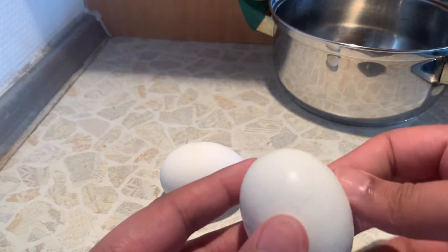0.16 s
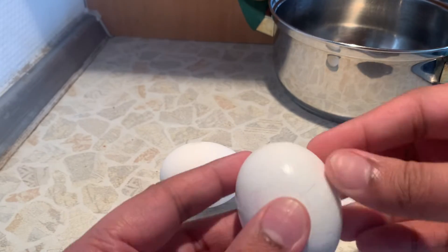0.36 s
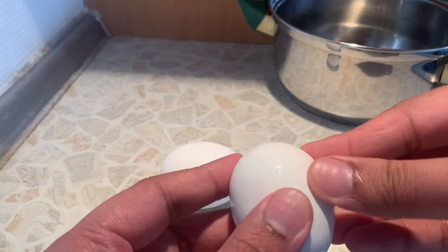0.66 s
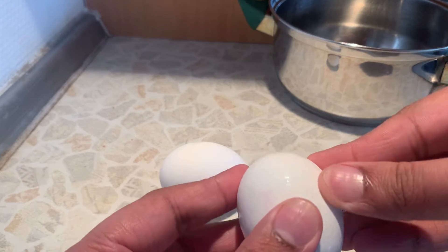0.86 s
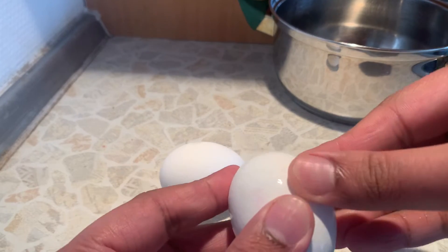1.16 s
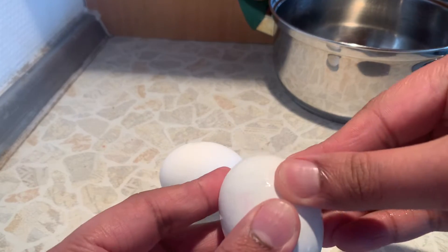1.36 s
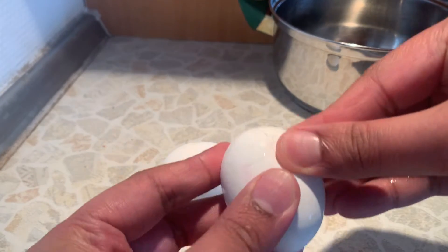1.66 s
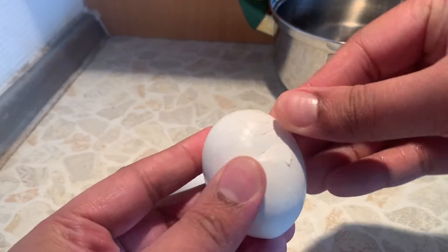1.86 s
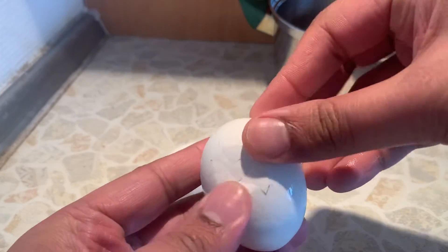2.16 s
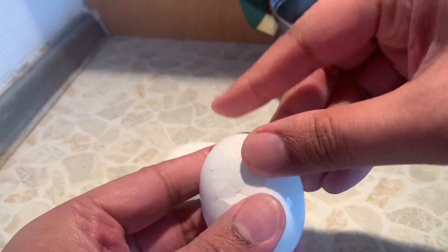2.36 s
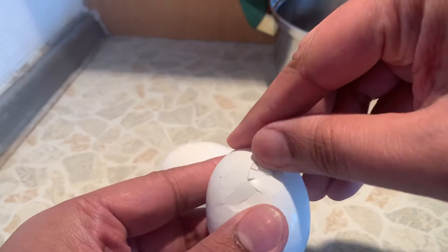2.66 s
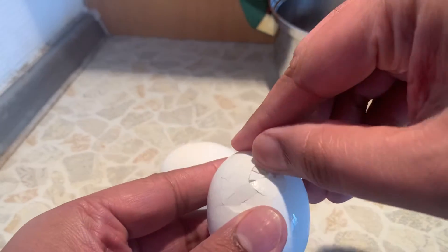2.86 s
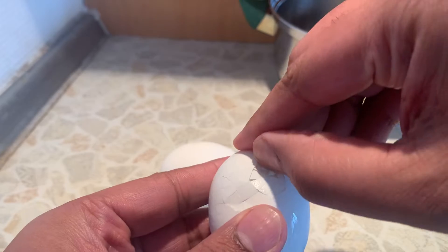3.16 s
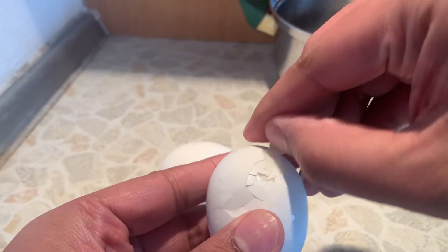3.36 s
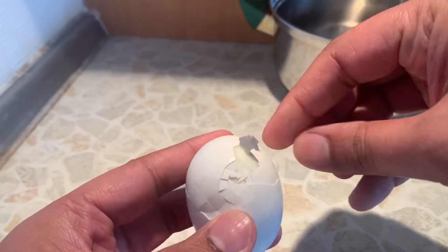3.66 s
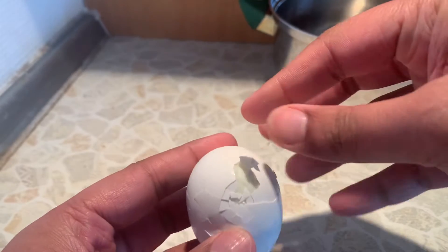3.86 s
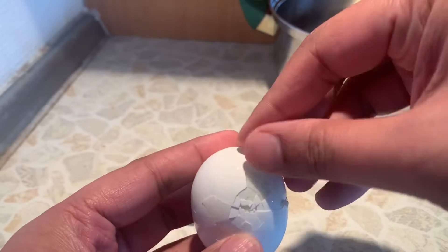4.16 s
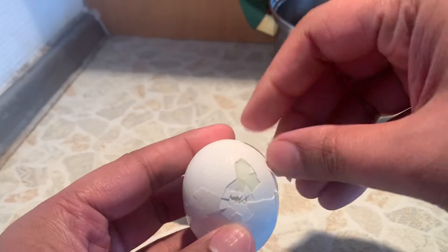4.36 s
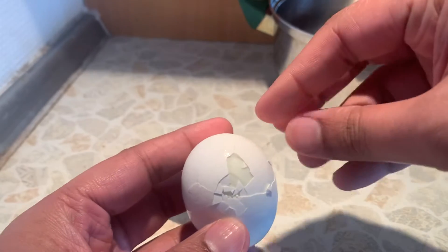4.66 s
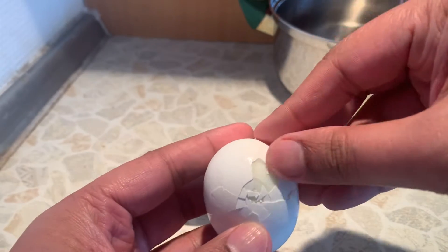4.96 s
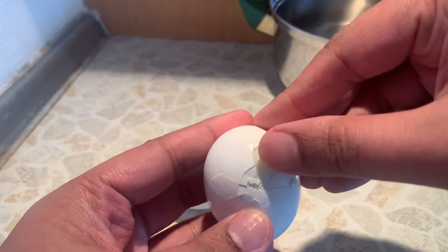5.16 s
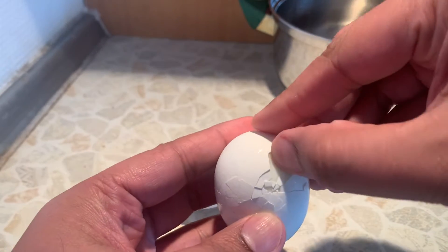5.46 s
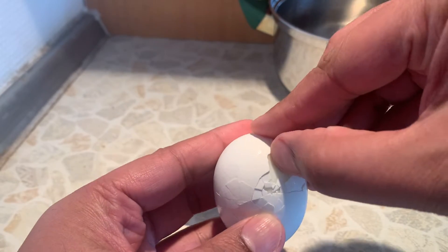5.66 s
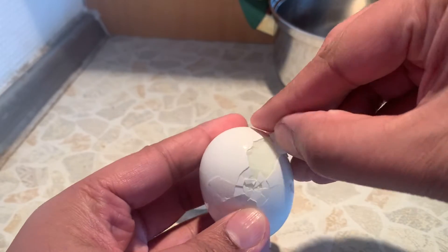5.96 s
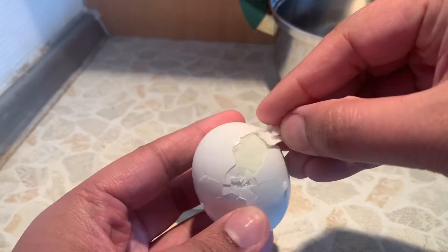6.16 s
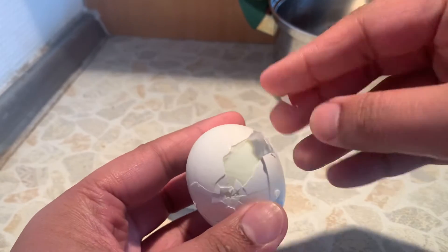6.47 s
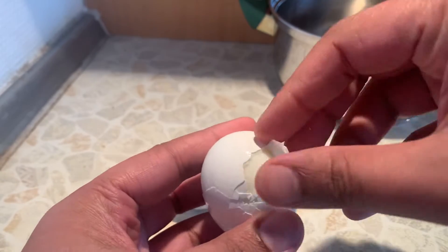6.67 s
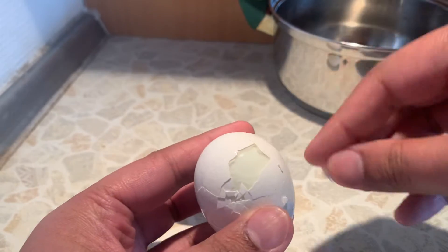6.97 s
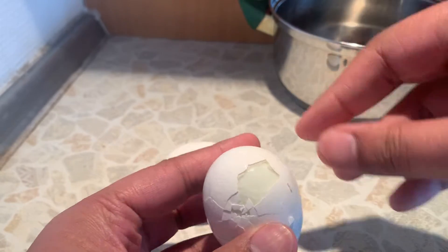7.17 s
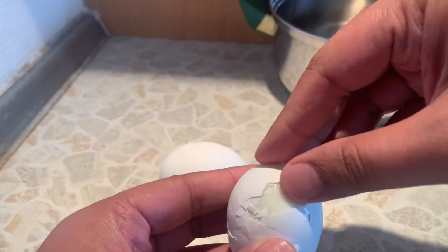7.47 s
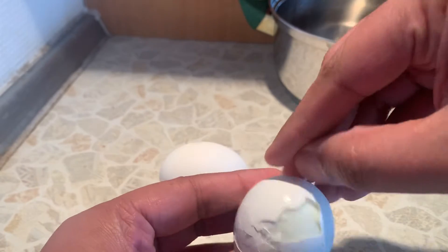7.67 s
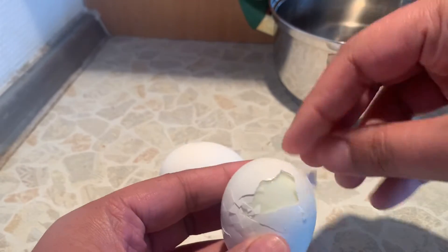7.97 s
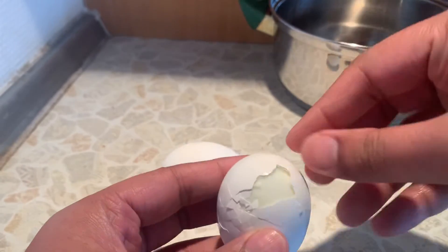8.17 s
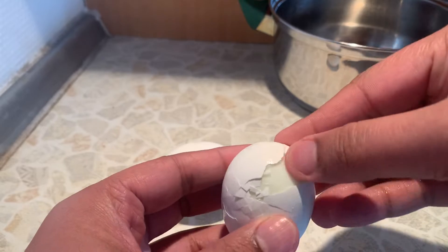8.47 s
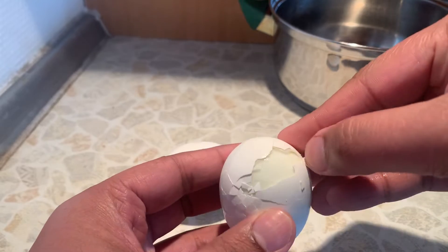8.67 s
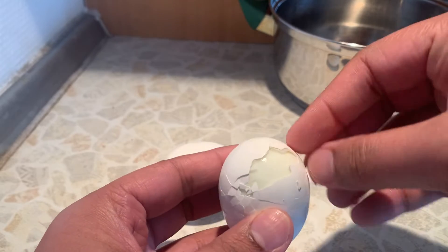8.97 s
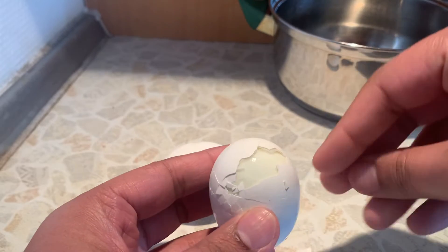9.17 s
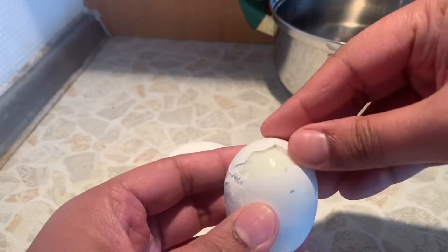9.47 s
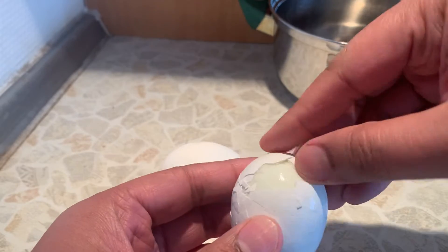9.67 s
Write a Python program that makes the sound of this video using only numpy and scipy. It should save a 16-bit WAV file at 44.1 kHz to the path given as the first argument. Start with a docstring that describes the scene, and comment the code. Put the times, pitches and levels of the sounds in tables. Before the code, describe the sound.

Close stereo pickup of a boiled egg being peeled by hand in a quiet kitchen, about ten seconds. Faint hiss and low hand rumble continue throughout. From 0 to 0.4 fingertips rub the smooth shell with barely audible squeaks; tiny ticks follow. At 1.4-1.7 the shell gives way in a dense, brittle crunch. Another crackling cluster comes at 2.35-2.6, then short cracks near 3.0, 3.3, 3.65 and 3.8. Sparse ticks and a thin bright crack at 4.6 lead to a soft rumble around 5. At 5.8-5.95 tearing builds to the loudest, very bright snap. Smaller crackles follow at 6.05-6.8 and 7.2-7.4. A strong, hollower snap lands at 7.69, with a dull thump. After quiet handling and low bumps, hollow ringing snaps cluster around 8.65, then lighter cracks at 9.15-9.75. Short, soft room reflections.

```python
"""A hard-boiled egg is cracked and peeled by hand, close up in a quiet kitchen.
Coloured noise makes the low rumble of the hands, the faint hiss, the first rubs and the dull thumps.
Then lifted shell snaps, and shell on the egg cracks with a small thud: short forces ring a piece of shell.
Around the breaks, clumps of tiny fractures crumble the shell and tear it off its skin.
Filtered, decaying noise lets the room answer the sounds of the egg all along."""
import sys
import numpy as np
from scipy import signal
from scipy.fft import rfft, irfft, next_fast_len
from scipy.io import wavfile
from scipy.ndimage import uniform_filter1d

SR = 44100
rng = np.random.default_rng(int(sys.argv[2]) if len(sys.argv) > 2 else 0)


def unload_wav(signal):
    """Save mono or channel-first audio to the path in sys.argv[1] as 16-bit WAV at rate SR, clipped to [-1, 1]."""
    wavfile.write(
        sys.argv[1],
        SR,
        np.round(np.clip(np.atleast_2d(signal).T, -1, 1) * 32767).astype(np.int16),
    )


N = 432621
EDGE_HZ = 16100  # upper limit of the sound

# registers of the shell, in order egg body, loose hollow shell, small plates, breaking edge: low_hz, high_hz
REGISTERS = [(350, 1300), (1300, 3400), (3400, 8000), (8000, 16500)]
# broad colour of breaking shell: frequency_hz, relative_level_db
SHELL_COLOUR = [(300, -12.5), (400, -10), (490, -1.5), (680, -4.5), (850, -18), (1100, -6.5), (1300, -10.5),
                (1600, -4), (2100, -1), (2500, -4), (3000, -7), (4200, -0.5), (5400, -1), (6700, 1),
                (8000, -2), (10300, 4.5), (11800, 3), (13200, 4.5), (15500, -1)]
# overtones of a curved piece of shell: multiple of its pitch, gain_db
PIECE_MODES = [(1, 7.5), (2.05, 0.5), (3.15, 1), (3.951, -0.5), (4.7, 4.5)]
# snaps of shell lifted clear of the egg: time_s, strength_db, depth_db, pitch_hz of the piece
SNAPS = [(0.732, -71.5, -1, 2310), (0.76, -73, 8, 2260), (1.037, -64.5, -7.5, 2530), (1.267, -89, 16, 2270),
         (1.392, -59.5, -16, 12160), (1.3987, -54.5, -17, 8050), (1.416, -56, -20, 12500),
         (1.429, -48.5, -15, 13760), (2.3416, -56, -18, 8600), (2.3982, -55, -21, 4380),
         (2.422, -47, -14, 6200), (2.429, -55, -9, 2690), (2.436, -58, -4, 4350), (2.468, -54, -16, 12000),
         (2.491, -54, -12, 6800), (2.4945, -52, -16, 11300), (2.501, -52.5, -11, 9000),
         (2.511, -44.5, -17, 11900), (2.5197, -45.5, -8, 10800), (2.7753, -72, -8, 4260),
         (2.8241, -77, -0.5, 5300), (2.849, -65, -19, 5250), (2.944, -55.5, -15.5, 8600),
         (3.036, -61, -31, 14000), (3.111, -70, -20, 11100), (3.119, -68.5, -18.5, 4620),
         (3.445, -63, -15, 13600), (3.4906, -56, -17, 4230), (3.78, -43, -22.5, 12140),
         (3.852, -54, -33.5, 14460), (3.86, -53, -41, 11800), (4.1086, -49, -20.5, 6700),
         (4.1168, -51, -17.5, 4360), (4.128, -57.5, -18.5, 6540), (4.568, -52.5, -19.5, 9600),
         (4.7595, -44, -20.5, 15300), (4.91, -63.5, -13, 11100), (4.953, -54.5, -18, 16100),
         (5.0931, -75.5, 0, 6240), (5.505, -66.5, -5.5, 1860), (5.5468, -68.5, -4, 3340),
         (5.572, -69, -11, 10800), (5.6876, -50.5, -28, 10700), (5.7918, -60, -26, 4850),
         (5.8483, -38, -32, 9700), (5.857, -45, -22, 8860), (5.881, -34.5, -22, 7000),
         (5.8837, -51.5, -1.5, 2150), (5.862, -40, -17, 10600), (5.8753, -45, -22, 4900),
         (5.8888, -37, -20, 6500), (5.897, -42.5, -23, 10300), (5.9069, -29.5, -29.5, 9900),
         (5.921, -28, -25.5, 9900), (5.926, -15.5, -33, 10400), (5.9274, -34.5, -10.5, 2190),
         (5.9275, -24, -22, 6300), (6.0372, -61, -36, 9900), (6.0572, -47, -24, 8430),
         (6.06, -41, -28, 9500), (6.1015, -57.5, -30, 10250), (6.117, -52, -11, 6300),
         (6.1897, -64, -10, 10360), (6.23, -64, -14.5, 10000), (6.2413, -56.5, -9, 2100),
         (6.25, -58.5, -9, 6150), (6.268, -63, -8, 10470), (6.525, -66.5, -7, 3490),
         (6.6001, -44.5, -33.5, 11500), (6.6217, -47.5, -44, 8850), (6.739, -46.5, -25.5, 10700),
         (6.749, -41, -18, 7530), (6.7595, -38, -18.5, 11460), (6.91, -51, -22, 8270),
         (6.9157, -48.5, -55.5, 13760), (6.9737, -65, -26.5, 9080), (7.089, -76, -17, 10000),
         (7.5755, -52, -48, 9860), (7.629, -45, -24, 11400), (7.6849, -22.5, -17.5, 10900),
         (7.687, -20.5, -13.5, 11500), (7.6877, -33.5, 9, 2000), (7.6923, -32.5, -3, 1900),
         (7.694, -36, -5, 3400), (7.713, -47, -11, 3450), (7.735, -56, 2, 3600), (7.751, -47.5, -13, 10500),
         (7.8002, -49.5, -15.5, 15100), (8.432, -92, 28.5, 1436), (8.466, -65.5, 17, 2024),
         (8.466, -63.5, 9.5, 2900), (8.492, -73.5, 7, 2820), (8.557, -72, 17, 2020),
         (8.5946, -56.5, -11, 2030), (8.606, -57, -15, 7000), (8.626, -32.5, -6.5, 3035),
         (8.647, -38, -9.5, 3150), (8.661, -49.5, 5.5, 3090), (8.672, -46.5, 3.5, 3070),
         (8.6745, -54.5, 7.5, 2130), (8.691, -37.5, -14, 2930), (8.776, -86, 28.5, 2160),
         (9.2147, -60.5, -18.5, 8600), (9.6682, -42.5, -7, 3920), (9.694, -54, -5, 10000),
         (9.744, -41, -4, 8000)]
# cracks of shell that still lies on the egg: time_s, strength_db, depth_db, pitch_hz of the piece
CRACKS = [(1.4517, -36.5, -8, 7200), (1.5026, -34, -9.5, 2670), (1.517, -29, -10, 2650),
          (1.5294, -41.5, -9.5, 3850), (1.5426, -52.5, -14, 4860), (1.563, -29.5, -8.5, 2705),
          (1.565, -28.5, -10.5, 7870), (1.568, -34.5, -6, 7850), (1.5583, -46, -8, 11100),
          (1.5767, -46, -16.5, 7300), (1.678, -64, -8, 9000), (1.6915, -54.5, -21, 11150),
          (1.7, -63.5, 3, 4580), (2.3631, -57.5, -1.5, 10480), (2.3709, -42.5, -10.5, 2590),
          (2.5445, -39.5, -9, 10770), (2.5874, -51.5, -6.5, 3390), (2.598, -64.5, -1.5, 11100),
          (2.9625, -49, -6.5, 7600), (3.0012, -57, -24, 7000), (3.007, -49, -26, 14050),
          (3.2592, -48, -0.5, 4250), (3.2625, -36, -16.5, 6660), (3.2646, -32, -19, 6900),
          (3.645, -33.5, -19, 12060), (3.8225, -54.5, -18, 10100), (4.606, -38.5, -21, 14940),
          (4.6066, -30, -20, 15140), (4.705, -42, -18.5, 15700), (5.4082, -57.5, -4.5, 4700),
          (5.928, -26, -18, 10400), (6.7785, -45, -7, 7610), (7.1708, -32.5, -12, 11300),
          (7.2748, -44.5, -10.5, 8370), (7.322, -55, -12, 8450), (7.4087, -43, -4.5, 4140),
          (7.4273, -44.5, -12, 8760), (8.0953, -41, -12, 8470), (9.152, -36, -15, 7740)]


def amp(db):
    """Decibels to gain."""
    return 10 ** (np.asarray(db) / 20)


def evened(x):
    """Scales to an rms of one."""
    return x / np.sqrt(np.mean(x ** 2) + 1e-20)


def read(points, hz):
    """Reads a table on a log-frequency axis."""
    table_hz, value = np.transpose(points)
    return np.interp(np.log(hz + 1), np.log(table_hz + 1), value)


def add(mix, s, sound):
    """Adds a stereo sound at time s."""
    part = mix[:, max(0, round(s * SR)):][:, :sound.shape[1]]
    part += sound[:, :part.shape[1]]


def causal(points, size=2048):
    """Minimum-phase ring: the given spectrum, with its energy as early as a causal sound allows."""
    log_gain = np.log(amp(read(points, abs(np.fft.fftfreq(size, 1 / SR)))))
    return np.fft.ifft(np.exp(np.conj(signal.hilbert(log_gain)))).real[:size // 2]


SHELL_RING = causal(SHELL_COLOUR)
REGISTER_FILTERS = [signal.butter(order, band, "bandpass", fs=SR, output="sos")
                    for order, band in zip((2, 4, 4, 5), REGISTERS)]


def pair(length, alike):
    """White noise at two microphones, partly shared."""
    first, other = rng.standard_normal((2, length))
    alike = np.clip(alike, 0, 1)
    return np.array([first, alike * first + np.sqrt(1 - alike ** 2) * other])


def drone(spectrum, alike, size=2 ** 19):
    """Steady noise of a given colour with an rms of one."""
    hz = np.fft.rfftfreq(size, 1 / SR)
    inside = (hz > spectrum[0][0]) & (hz < spectrum[-1][0])
    coloured = rfft(pair(size, alike)) * amp(read(spectrum, hz)) * inside
    return evened(irfft(coloured)[:, :N])


def resonate(x, hz, q):
    """A resonance of gain one at hz."""
    return signal.lfilter(*signal.iirpeak(np.clip(hz, 100, SR / 2.2), max(q, 1), fs=SR), x)


def glide(x, hz, q):
    """A resonance of gain one follows the curve hz: shift down to zero, smooth, shift back up."""
    turn = np.exp(2j * np.pi * np.cumsum(hz) / SR)
    decay = np.exp(-np.pi * hz.mean() / max(q, 1) / SR)
    return 2 * (turn * signal.lfilter([1 - decay], [1, -decay], x / turn)).real


def jolts(times, levels_db, fall_s=0.04):
    """An envelope that swells after each break and dies away exponentially."""
    kicks = np.zeros(N)
    kicks[(times * SR).astype(int)] = amp(levels_db)
    u = np.arange(SR // 2) / SR / fall_s
    return signal.oaconvolve(kicks, (1 - np.exp(-10 * u)) * np.exp(-u))[:N]


def background(air_db=-81, jolt_rumble_db=-27.5, jolt_brush_db=-32.5):
    """Steady hiss, with noise bands for rumble and brush of hands that move and are jolted by the breaks."""
    # still air of the room: frequency_hz, relative_level_db per Hz
    air_colour = [(300, 16.5), (450, 12), (700, 7.5), (1400, 3), (2500, 1.5), (4500, -1), (7000, -2.5),
                  (8500, -13), (11000, 2), (13500, -7.5), (15300, -6), (16300, -10.5)]
    # rumble of the hands: frequency_hz, relative_level_db per Hz
    rumble_colour = [(15, -7.5), (33, 0.5), (45, -2.5), (58, -3), (71, 3), (85, -13), (120, -14.5),
                     (200, -34.5), (400, -59.5)]
    # rumble of the moving hands, before the stereo balance: time_s, level_db
    rumble_swell = [(0, -70.5), (.63, -64), (1.88, -72), (2.46, -64.5), (2.98, -74.5), (4.1, -70.5),
                    (4.35, -62.5), (4.8, -67.5), (5, -51), (5.7, -68.5), (6.3, -65), (7.6, -63.5),
                    (7.95, -59), (8.3, -48.5), (8.5, -57), (9.81, -65)]
    # soft brushing of skin: frequency_hz, relative_level_db per Hz
    brush_colour = [(60, -18), (105, -4.5), (152, -3.5), (200, -6), (260, -14.5), (400, -22.5),
                    (700, -42.5)]
    # brushing of skin, before the stereo balance: time_s, level_db
    brush_swell = [(0, -78), (.3, -75), (2, -79), (4.5, -77.5), (5, -72), (5.6, -76.5), (6.4, -79),
                   (7.65, -72.5), (7.79, -68), (8.1, -69.5), (8.33, -67.5), (8.5, -75), (8.82, -68.5),
                   (9.3, -72), (9.81, -74)]
    t = np.arange(N) / SR
    crack_s, crack_db, crack_depth_db, _ = np.transpose(CRACKS)
    snap_s, snap_db, snap_depth_db, _ = np.transpose(SNAPS)
    # snaps let the hand recoil
    rumble_level = amp(np.interp(t, *np.transpose(rumble_swell)))
    rumble_level = rumble_level + jolts(snap_s, snap_db + snap_depth_db + jolt_rumble_db)
    # cracks brush the skin
    brush_level = amp(np.interp(t, *np.transpose(brush_swell)))
    brush_level = brush_level + jolts(crack_s, crack_db + crack_depth_db + jolt_brush_db)
    hands = drone(rumble_colour, .87) * rumble_level + drone(brush_colour, 0.99) * brush_level
    left_right_db = [[-1.0], [1.8]]
    return amp(air_db) * drone(air_colour, 0.027) + hands * amp(left_right_db)


def rubs(squeak_db=1, squeak_q=7, squeak_rise=0.13, catch_db=3.0, scuff_db=-8, scuff_depth_db=1,
         scuff_contact_db=-8, catch_samples=400, scuffs=4):
    """Skin catches and slips on shell; its squeak rises with the speed of the stroke, rough spots scuff."""
    # fingertips sliding over smooth shell: start_s, end_s, level_db, squeak_hz at top speed, treble_gain_db
    strokes = [(0.042, 0.225, -83.5, 6000, 1), (0.224, 0.331, -79.5, 4950, -10),
               (0.308, 0.386, -73, 6200, 0), (2.095, 2.307, -84.5, 6500, 4), (4.279, 4.421, -71.5, 6900, 1),
               (4.415, 4.491, -77.5, 4500, -4.5), (8.956, 9.07, -77, 5200, -6.5)]
    # colour of skin on shell: frequency_hz, relative_level_db per Hz
    skin_colour = [(900, -24), (2500, -19.5), (4700, -10), (7000, -5), (8400, -10), (10300, 6), (12000, -2),
                   (13300, -2), (15300, -3), (16500, -7)]
    out, hiss = np.zeros((2, N)), drone(skin_colour, 0.69)
    catches = evened(uniform_filter1d(rng.standard_normal(N), catch_samples))
    for start, end, db, squeak_hz, treble_db in strokes:
        span = slice(int(start * SR), int(end * SR))
        slide = hiss[:, span] * amp(catch_db * catches[span])
        speed = np.sin(np.linspace(0, np.pi, slide.shape[1]))
        slide = slide + (amp(treble_db) - 1) * signal.sosfiltfilt(REGISTER_FILTERS[-1], slide)
        curve_hz = squeak_hz * (1 + squeak_rise * (speed - 1))
        slide = slide + amp(squeak_db) * glide(slide, curve_hz, squeak_q)
        add(out, start, amp(db) * evened(speed * slide))
        for when, pitch in rng.random((scuffs, 2)):
            s = start + when * (end - start)
            add(out, *piece(s, db + scuff_db, scuff_depth_db, scuff_contact_db, 2000 + 2000 * pitch))
    return out


def piece(s, db, depth_db, contact_db, piece_hz):
    """One break of one piece of shell: its strength is shared out, then it snaps."""
    return snap((s, *registers(db, depth_db, contact_db, piece_hz), piece_hz))


def registers(db, depth_db, contact_db, piece_hz):
    """Depth feeds the hollow shell and partly the plates; contact with the shell feeds the egg body."""
    plate_hz, plate_octaves, plate_ring_db = 5450, 0.6, 11.5
    # a piece pitched among the plates makes them ring
    among_plates = np.exp(-(np.log2(piece_hz / plate_hz) / plate_octaves) ** 2)
    plate_db = db - 7 + 0.42 * depth_db + plate_ring_db * among_plates
    return [db + depth_db + contact_db, db + depth_db, plate_db, db]


def snap(row, jump=0.94, run_s=0.00047, run_share=0.25, scatter_s=0.006, scatter_share=0.066, piece_q=11,
         mode_db=-31.5, lead_s=0.0009, lead_share=0.02, hollow_db=-39.5, modes=14, hollow_modes=5):
    """Micro-cracks gather, a crack jumps, runs on and scatters off fingers and counter; the piece rings."""
    s, *levels_db, piece_hz = row
    before = SR // 300  # samples of lead-in
    t = (np.arange(SR // 30) - before) / SR
    after = np.maximum(t, 0)
    echoes = signal.lfilter([.7, .3], [1], pair(len(t), 0.65))  # skin dulls what it throws back
    force = run_share * np.exp(-after / run_s) * pair(len(t), .92)
    force += scatter_share * np.exp(-after / scatter_s) * echoes

    def random_modes(low, high, count):
        """Sums dying sines with pitch (Hz), decay (s) and phase (cycles) drawn between low and high."""
        hz, decay_s, phase = rng.uniform(low, high, (count, 3)).T[:, :, None]
        return (np.exp(-after / decay_s) * np.sin(2 * np.pi * (hz * t + phase))).sum(0)

    # every jagged piece has its own modes, and so has the shell under it
    force += amp(mode_db) * random_modes([2600, .002, 0], [15800, .006, 1], modes)
    force += amp(hollow_db) * random_modes([450, .004, 0], [2600, .009, 1], hollow_modes)
    gathering = lead_share * np.exp(-abs(t) / lead_s) * pair(len(t), 0.73)
    force = np.where(t < 0, gathering, force)
    force[:, before:before + 2] += [jump, -jump]  # a push and a pull, strong in the treble
    force = ring_piece(fingers(force), piece_hz, piece_q)
    return s - before / SR, sound_shell(force, levels_db, .008 + before / SR)


def fingers(force, near=.25, far=0.39, near_s=.0012, far_s=.004, count=3):
    """Single echoes: bright off the nearest fingertips, dull off the hands and apart at each microphone."""
    out = force.copy()
    dull = signal.lfilter(*signal.butter(2, 6000, fs=SR), force)
    # near_s and far_s are the longest delays; the sign draw leaves about half the near echoes inverted
    for early, left, right, sign in rng.uniform(.1, 1, (count, 4)):
        add(out, early * near_s, np.sign(sign - .5) * near * force)
        add(out, left * far_s, far * dull * [[1], [0]])
        add(out, right * far_s, far * dull * [[0], [1]])
    return out


def ring_piece(force, piece_hz, q):
    """A force rings a piece of shell at its pitch and overtones."""
    return force + sum(amp(db) * resonate(force, piece_hz * k, q * np.sqrt(k))
                       for k, db in PIECE_MODES if piece_hz * k < EDGE_HZ)


def sound_shell(force, levels_db, span_s):
    """A force sounds each register of the shell at its own rms level over the first span_s."""
    ring = signal.fftconvolve(force, SHELL_RING[None], axes=1)
    count = max(1, int(span_s * SR))
    bands = [signal.sosfilt(sos, ring) for sos in REGISTER_FILTERS]
    return sum(amp(db) * band / np.sqrt(np.mean(band[:, :count] ** 2) + 1e-20)
               for db, band in zip(levels_db, bands))


def all_round(x, blur_hz=350, smooth_samples=60):
    """The room hears each piece from all sides at once: a random frequency shift blurs its pitch."""
    wander_hz = blur_hz * evened(uniform_filter1d(rng.standard_normal(N), smooth_samples))
    turn = np.exp(2j * np.pi * np.cumsum(wander_hz) / SR)
    return (signal.hilbert(x, next_fast_len(N))[:, :N] * turn).real


def kitchen(x, onset_s=0.001, size=SR * 5 // 8):
    """Dense reflections that build up quickly and die band by band."""
    # kitchen reverberation: frequency_hz, t60_s
    reverb_times = [(300, 0.43), (1000, 0.16), (2000, 0.29), (4500, 0.31), (8000, 0.12), (11000, 0.27),
                    (15000, 0.4)]
    t = np.arange(size) / SR
    hz, times, grid = signal.stft(pair(size, 0.52), SR, nperseg=256)
    decay = amp(-60 * times / read(reverb_times, hz)[:, None])
    tail = signal.istft(grid * decay, SR, nperseg=256)[1][:, :size]
    tail = tail * (1 - np.exp(-(t / onset_s) ** 2))
    # what the walls return: frequency_hz, gain_db
    walls = causal([(300, -7.5), (1000, -7.0), (2200, -13), (4000, -10.5), (6300, -10.0), (9000, -19),
                    (15000, -23.5)])
    tail = signal.fftconvolve(tail / np.linalg.norm(tail[0]), walls[None], axes=1)
    return signal.fftconvolve(x, tail, axes=1)[:, :N]


def thumps():
    """Each shift of grip swells and dies in the low resonance of the hands, a band of noise."""
    # dull thumps as the hands shift their grip: start_s, peak_db, length_s
    grips = [(0.15, -77, 0.46), (4.96, -73.5, 0.16), (5.94, -68, .06), (7.722, -55.5, 0.15),
             (7.85, -61, 0.27), (8.25, -65, 0.11), (8.58, -60.5, 0.11), (8.755, -61, 0.11),
             (8.86, -72, 0.1), (9.2, -69.5, 0.19)]
    # low resonance of the hands: frequency_hz, relative_level_db per Hz
    thump_colour = [(90, -25.5), (130, -6.5), (150, 3), (180, -6), (215, -17), (300, -35.5)]
    t = np.arange(N) / SR
    # the exponent below one makes the rise quicker than the fall
    swell = sum(amp(db) * np.sin(np.pi * np.clip((t - s) / length, 0, 1) ** 0.53) for s, db, length in grips)
    return swell * drone(thump_colour, 0.87)


def breaks(table, contact_db, give_s=0.0026, give_db=-21, settle_s=.002, settle_db=-14.5, give_above_db=-52):
    """Breaks with one contact to the egg; small breaks announce a strong one and follow as it settles."""
    out = np.zeros((2, N))
    for s, db, depth_db, piece_hz in table:
        # give_s and settle_s are mean gaps
        early, late, pitch_before, pitch_after = rng.uniform(.5, 1.5, 4)
        add(out, *piece(s, db, depth_db, contact_db, piece_hz))
        if db > give_above_db:
            add(out, *piece(s - early * give_s, db + give_db, depth_db, contact_db, piece_hz * pitch_before))
            settled_hz = piece_hz * (.5 + pitch_after)
            add(out, *piece(s + late * settle_s, db + settle_db, depth_db, contact_db, settled_hz))
    return out


def loose_shell(loose_db=-17.5, detune=.02):
    """Each snap rings the modes of the loosened shell and a nearby pot, more when deeper; the grip shifts their
    pitch."""
    # modes of the loosened shell, with long rings near 1714, 1850, 3830 and 4050 Hz from a nearby pot ringing
    # along: frequency_hz before the shift, relative_level_db, t60_s
    loose_modes = [(1406, -11, 0.1), (1714, -18.5, 0.38), (1850, -15, 0.15), (2010, -4, 0.076),
                   (2110, 0.5, 0.07), (3040, -5.5, 0.15), (3350, -12, .08), (3570, -12, .1),
                   (3830, -18.5, 0.18), (4050, -13.5, 0.22), (4600, -13, .07), (6800, -10.5, .04)]
    out = np.zeros((2, N))
    t = np.arange(SR // 5) / SR
    hz, mode_db, t60 = np.transpose(loose_modes)[:, :, None]
    for s, db, depth_db, _ in SNAPS:
        phase, share, grip = rng.random((3, len(loose_modes), 1))
        held_hz = hz * (1 + detune * (grip - .5))
        level = (.5 + share) * amp(mode_db - 60 * t / t60)
        ring = (level * np.sin(2 * np.pi * (held_hz * t + phase))).sum(0)
        ring = ring * amp(db + depth_db + loose_db) * (1 - np.exp(-t / 0.00052))  # soft onset
        add(out, s, np.array([ring, ring]))
    return out


def fidget(count=40, quietest_db=-87, range_db=7):
    """Fingertips and nails shift on the cracked shell: faint ticks at random moments."""
    ticks = np.zeros((2, N))
    first_s = CRACKS[0][0]
    for when, size, bright, pitch in rng.random((count, 4)):
        register_db = np.array([-12, -1 - 10 * bright, -2, 8 * bright - 3])
        levels_db = quietest_db + range_db * size ** 2 + register_db
        s = first_s + when * (N / SR - first_s)
        add(ticks, *snap((s, *levels_db, 2000 + 6000 * pitch)))
    return ticks


def peeling(crumb_depth_db=-6, crumbs=3, scatter_s=0.0028, crumb_db=-7.5, crumb_range_db=9.5, cap_db=-50.5):
    """Each stretch of tearing sounds the shell and sheds a few crumbs around it, mostly small."""
    # crumbling and tearing: start_s, end_s, strength_db, depth_db, contact_db with the egg, flap_hz
    tears = [(1.46, 1.515, -60, -2.5, -4.5, 2750), (1.524, 1.56, -48, -10, 4.5, 2734),
             (1.563, 1.569, -28, -5.5, -7.5, 2744), (1.57, 1.6, -62, -13, 1, 7000),
             (1.601, 1.715, -67.5, -6, -3, 6950), (2.363, 2.398, -65, -3, 1, 2700),
             (2.41, 2.461, -59.5, -3, -10, 2750), (2.511, 2.55, -44.5, -10, 1.5, 10200),
             (2.557, 2.611, -67, -7, 9, 2800), (2.961, 3.032, -68, -13, 8.5, 7230),
             (3.227, 3.26, -55.5, -9, -2, 4160), (3.253, 3.272, -45.5, -8.5, 0, 4150),
             (3.275, 3.279, -34, -20.5, -6, 12300), (3.281, 3.3, -51.5, -10, -13, 4150),
             (3.437, 3.526, -70.5, -10.5, -3.5, 4200), (3.647, 3.659, -48, -12.5, -1, 13900),
             (3.774, 3.836, -64.5, -12, 0.5, 11170), (4.608, 4.621, -45.5, -10.5, -1, 15050),
             (4.621, 4.662, -64, -1.5, -1, 15050), (5.371, 5.435, -66.5, -11, 7.5, 7600),
             (5.776, 5.856, -64, -38, 0, 4760), (5.851, 5.905, -47, -16.5, -12, 4930),
             (5.909, 5.924, -30, -28, -9.5, 6350), (6.051, 6.073, -52, -22, -9, 6240),
             (6.076, 6.138, -73.5, -11, -1, 6350), (6.221, 6.283, -68, -3, -8.5, 6500),
             (6.728, 6.756, -52, -18, -15.5, 11050), (6.762, 6.783, -41.5, -21.5, 0, 11400),
             (7.173, 7.181, -48.5, -13, -3, 8300), (7.535, 7.687, -64, -10, -8.5, 10000),
             (7.676, 7.703, -41.5, -1.5, -16, 3300), (7.6836, 7.688, -25, -8, -23, 3410),
             (8.598, 8.637, -63, -2, -17, 7200), (8.643, 8.679, -37.5, -10, -27, 3080),
             (9.177, 9.228, -64, -8, -10, 7980)]
    out = np.zeros((2, N))
    for start, end, db, depth_db, contact_db, flap_hz in tears:
        add(out, *tear((start, end, *registers(db, depth_db, contact_db, flap_hz)), flap_hz))
        for when, size, pitch in rng.random((crumbs, 3)):
            s = start - scatter_s + when * (end - start + 2 * scatter_s)
            # above the cap a harder tear sheds no bigger crumbs
            size_db = min(db, cap_db) + crumb_db + crumb_range_db * size ** 2
            add(out, *piece(s, size_db, depth_db + crumb_depth_db, contact_db, 3000 + 9000 * pitch))
    return out


def tear(row, flap_hz, grain_s=0.0018, flap_q=9, chip_db=5, chip_q=20, rub=0.28, clump_db=3.5,
         sag_octaves=0.19, chips=5):
    """Uneven fractures come in clumps and sound chips and a flap that sinks in pitch as it comes free."""
    start, end, *levels_db = row
    per_s, spread_db, clump_s = 420, 5.5, .006
    own = np.random.default_rng(rng.integers(2 ** 31))  # each tear has its own draws
    chip_hz = np.exp(own.uniform(np.log(2500), np.log(15000), chips))
    length = max(int((end - start) * SR), SR // 256)
    clump_index = np.arange(length) / SR / clump_s
    clumps = np.interp(clump_index, np.arange(64), own.uniform(-1.7, 1.7, 64))
    chance, size = own.random((SR // 4, 2))[:length].T
    middle, side = own.standard_normal((length, 2)).T
    chance[length // 4] = 0  # at least one fracture
    fractures = (chance < per_s / SR) * amp(spread_db * np.minimum(-np.log(size + 1e-9), 2.5))
    # powers add up; each fracture dies in about two milliseconds
    t = np.arange(SR // 200) / SR
    power = signal.fftconvolve(fractures ** 2, np.exp(-2 * t / grain_s))[:length]
    envelope = evened(np.sqrt(abs(power))) + rub
    envelope = envelope * amp(clump_db * clumps) * signal.windows.tukey(length, .25)
    noise = np.array([middle + 0.095 * side, middle - 0.2 * side])
    force = np.pad(envelope * noise, ((0, 0), (0, SR // 100)))
    force = force + amp(chip_db) * sum(resonate(force, hz, chip_q) for hz in chip_hz)
    sinking_hz = flap_hz * 2 ** (sag_octaves * np.linspace(.5, -.5, force.shape[1]))
    force = force + sum(amp(db) * glide(force, sinking_hz * k, flap_q * np.sqrt(k))
                        for k, db in PIECE_MODES if flap_hz * k < EDGE_HZ)
    return start, sound_shell(force, levels_db, length / SR)


def scene():
    """Rubs, snaps, cracks, finger ticks and tearing sound in the kitchen over the noises of the hands."""
    broken = breaks(SNAPS, contact_db=-27) + breaks(CRACKS, contact_db=-6.5)
    egg = rubs() + amp(-5.5) * broken + loose_shell() + fidget() + amp(-3.5) * peeling()
    return background() + egg + kitchen(all_round(egg)) + thumps()


def record(dry):
    """The two microphone ports differ in phase, and a low-pass filter limits the band."""
    # how far the left microphone lags the right: frequency_hz, lag_radians
    port_phase = [(0, -0.06), (1100, 1.37), (2150, 0.6), (2800, 4), (4500, 5), (8400, 9), (13500, 16.5),
                  (15300, 17), (16500, 20)]
    size = next_fast_len(N + 4096)
    behind = np.interp(np.fft.rfftfreq(size, 1 / SR), *np.transpose(port_phase))
    left = irfft(rfft(dry[0], size) * np.exp(-1j * behind), size)[:N]
    band_limit = signal.firwin(255, EDGE_HZ, window=("kaiser", 8), fs=SR)
    return signal.oaconvolve(np.array([left, dry[1]]), band_limit[None], "same")


dry = scene()
out = record(dry)
unload_wav(out)
```